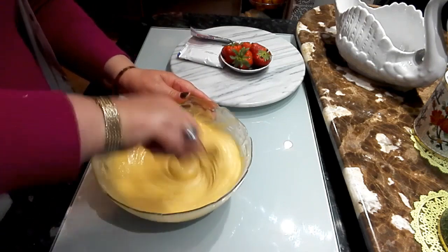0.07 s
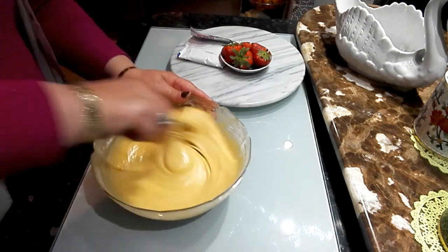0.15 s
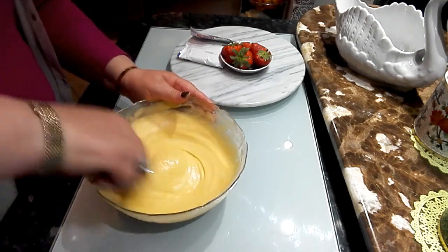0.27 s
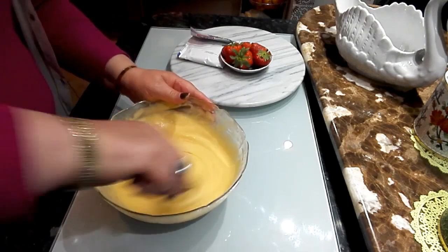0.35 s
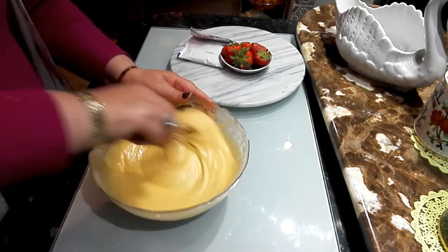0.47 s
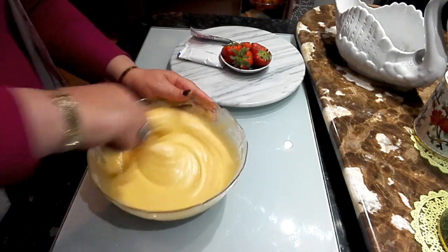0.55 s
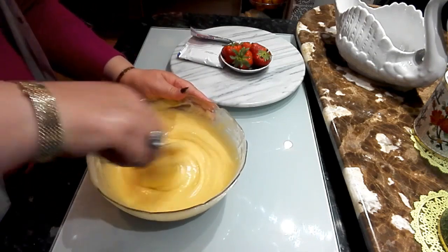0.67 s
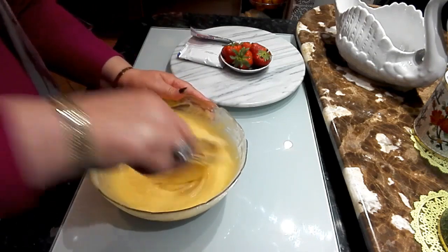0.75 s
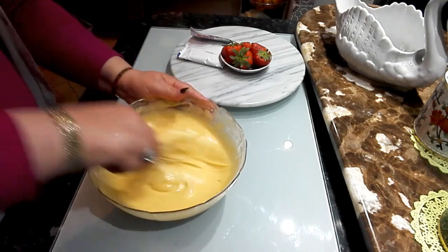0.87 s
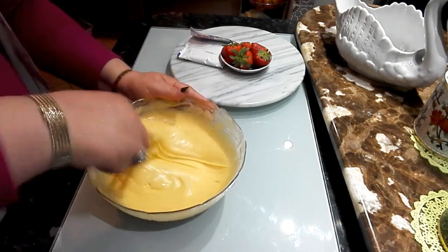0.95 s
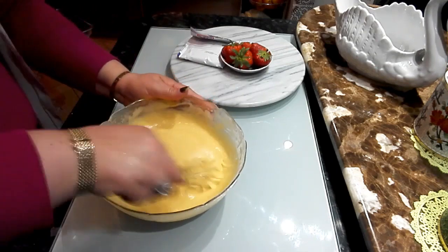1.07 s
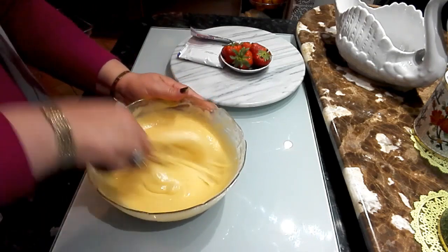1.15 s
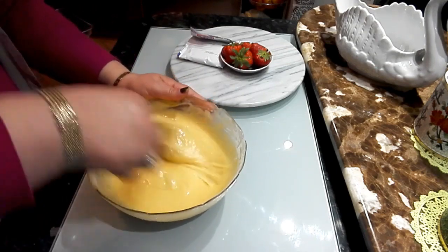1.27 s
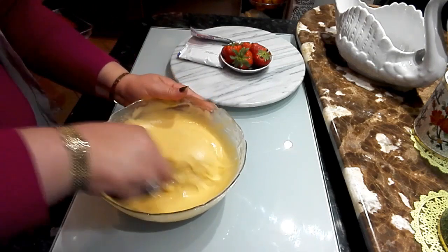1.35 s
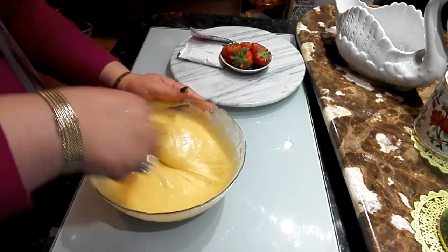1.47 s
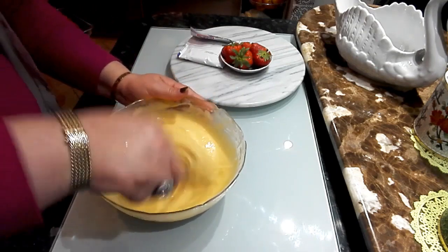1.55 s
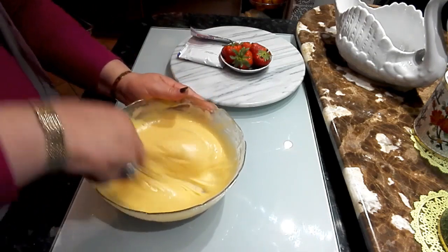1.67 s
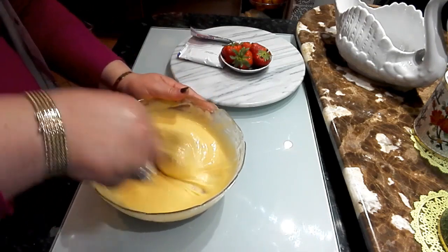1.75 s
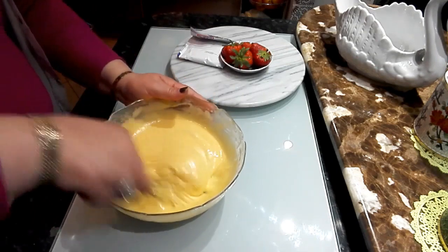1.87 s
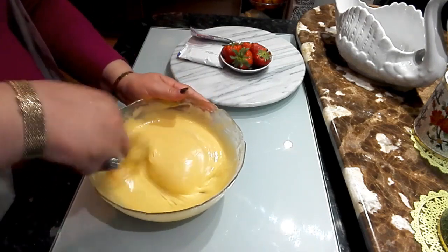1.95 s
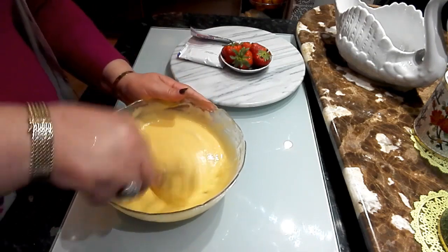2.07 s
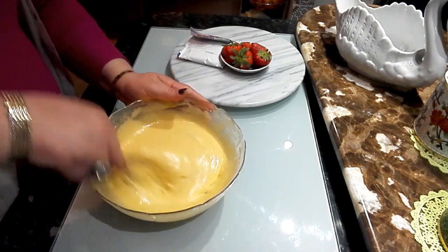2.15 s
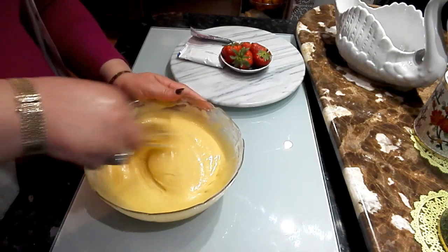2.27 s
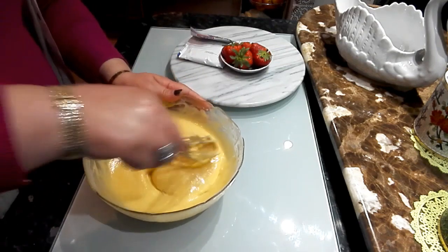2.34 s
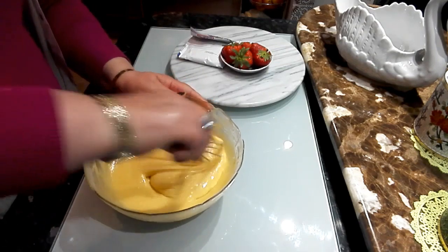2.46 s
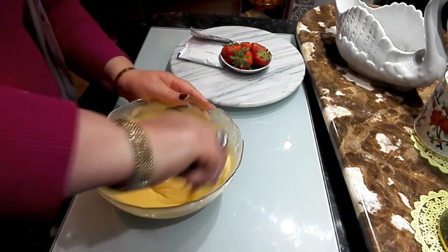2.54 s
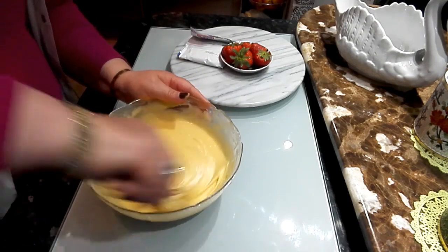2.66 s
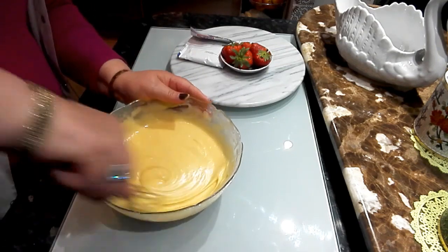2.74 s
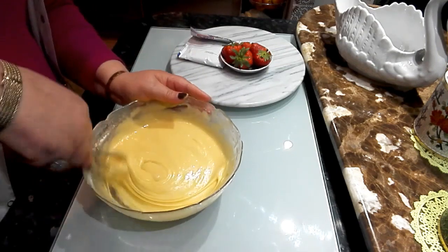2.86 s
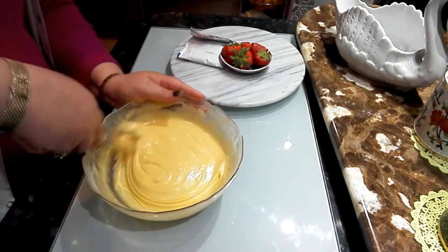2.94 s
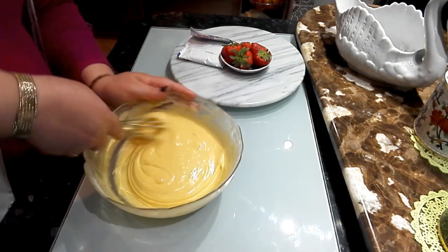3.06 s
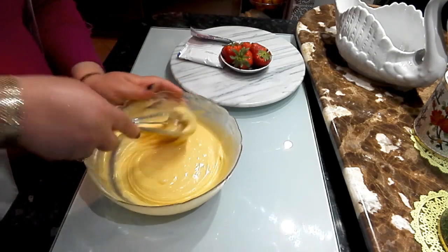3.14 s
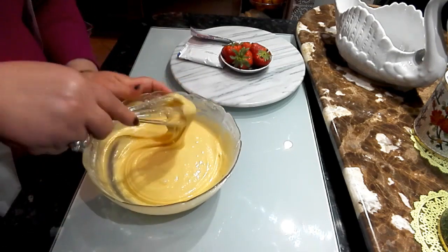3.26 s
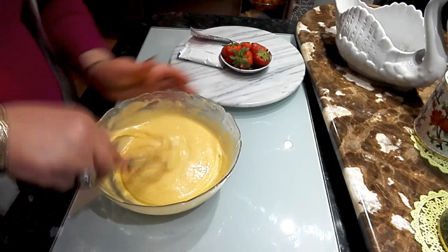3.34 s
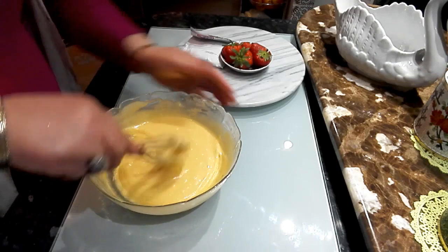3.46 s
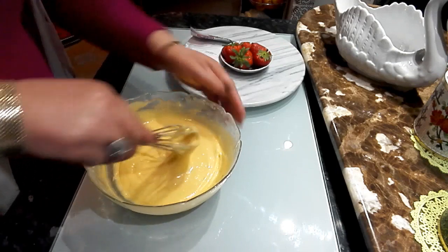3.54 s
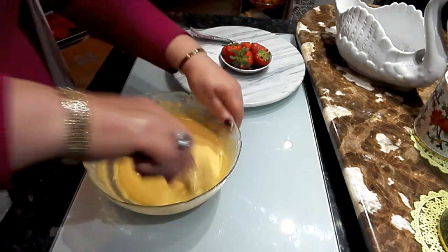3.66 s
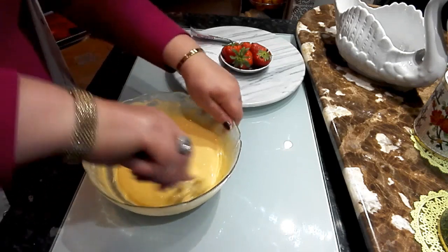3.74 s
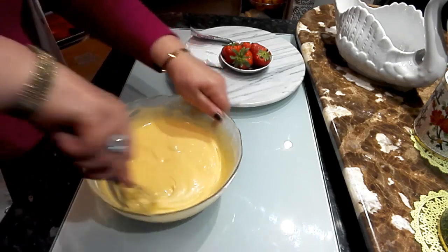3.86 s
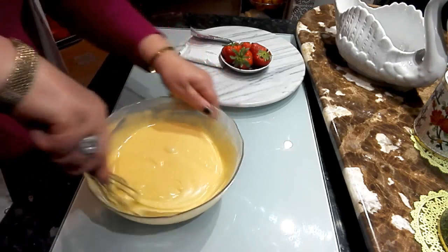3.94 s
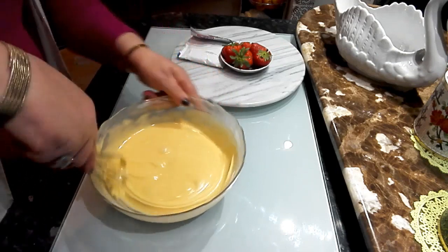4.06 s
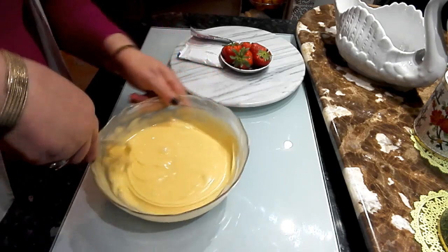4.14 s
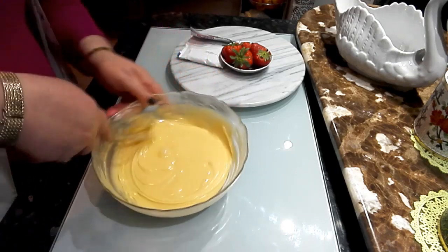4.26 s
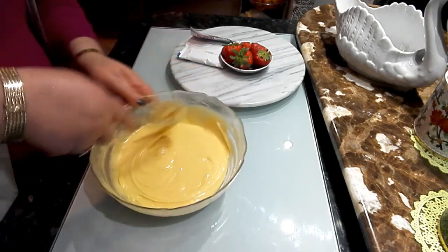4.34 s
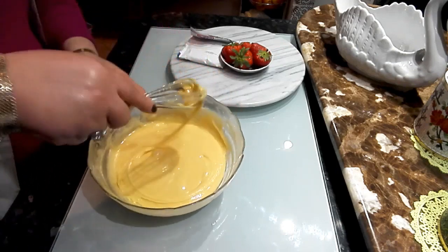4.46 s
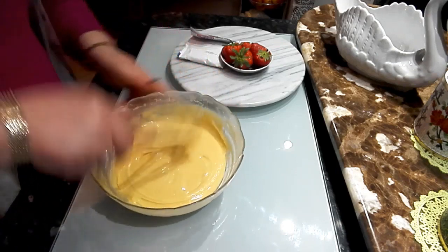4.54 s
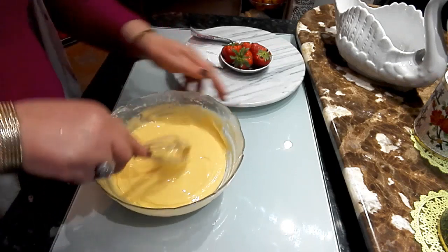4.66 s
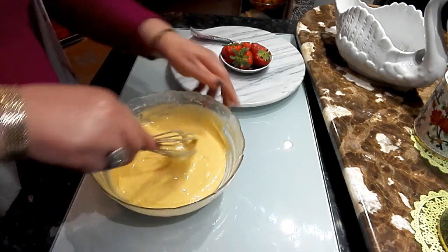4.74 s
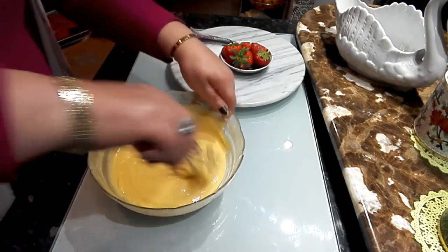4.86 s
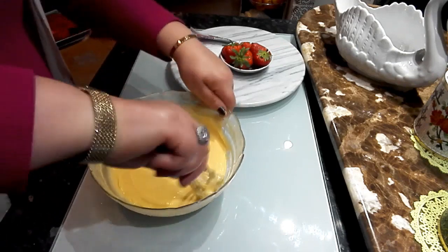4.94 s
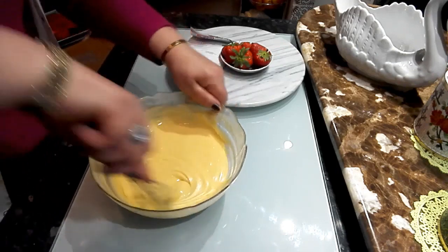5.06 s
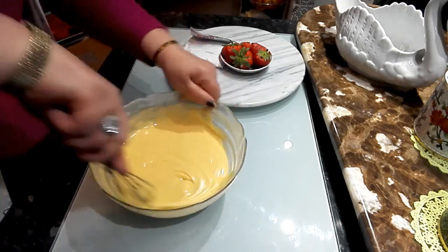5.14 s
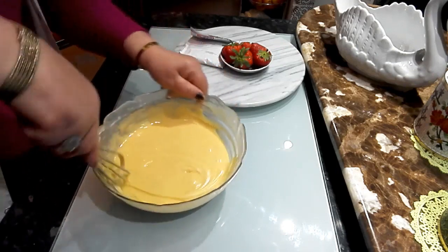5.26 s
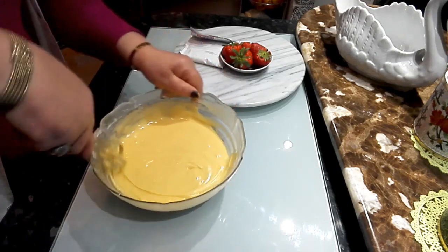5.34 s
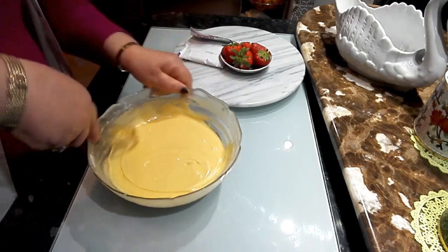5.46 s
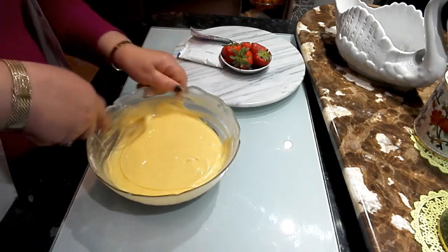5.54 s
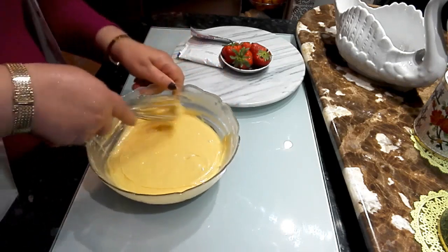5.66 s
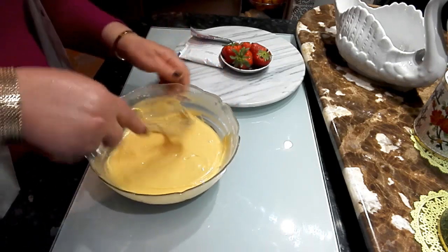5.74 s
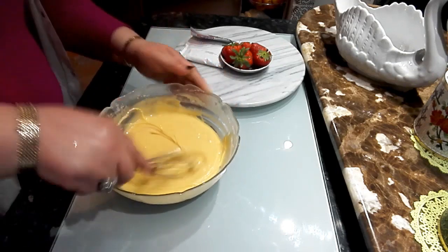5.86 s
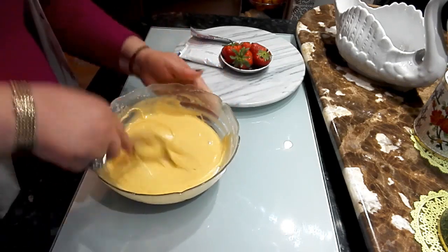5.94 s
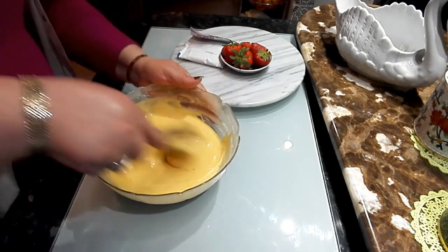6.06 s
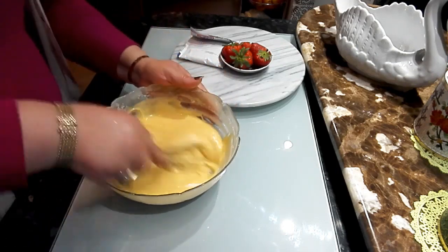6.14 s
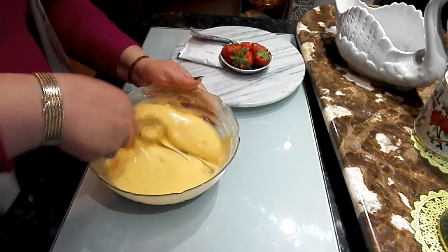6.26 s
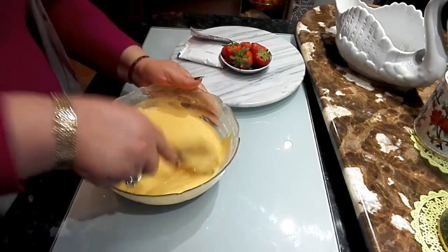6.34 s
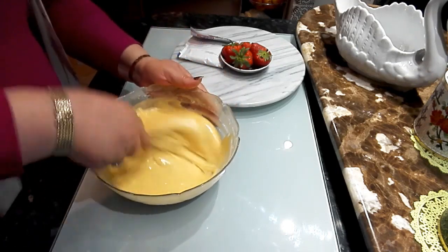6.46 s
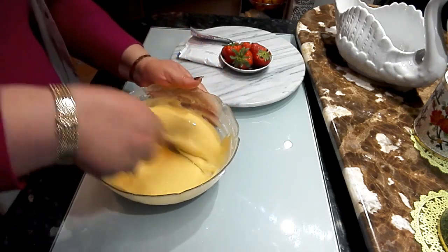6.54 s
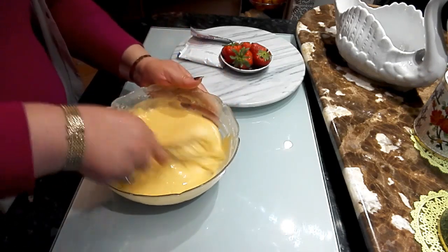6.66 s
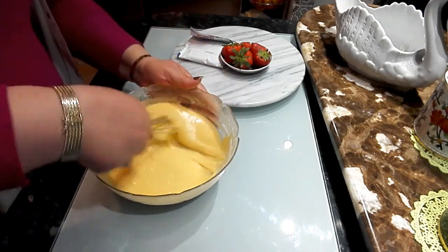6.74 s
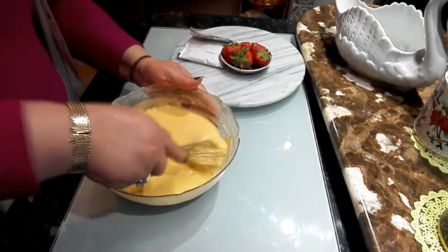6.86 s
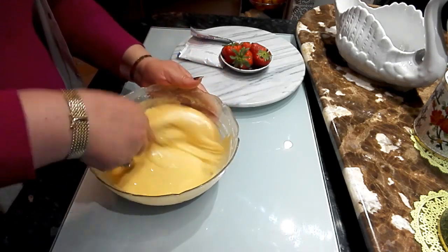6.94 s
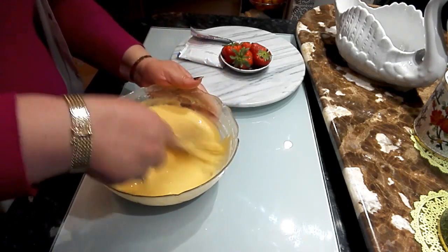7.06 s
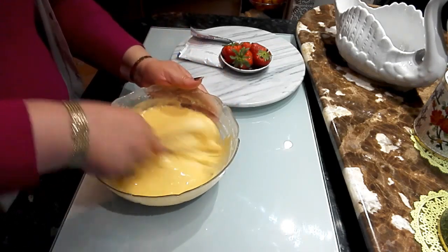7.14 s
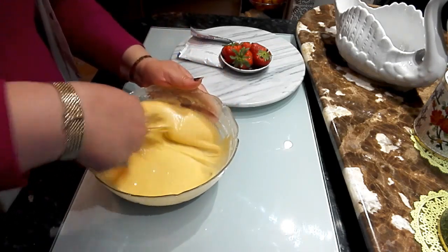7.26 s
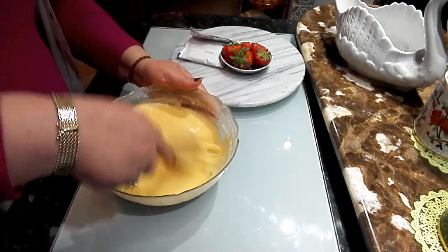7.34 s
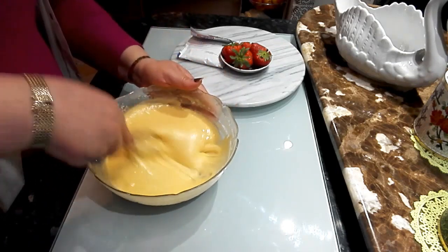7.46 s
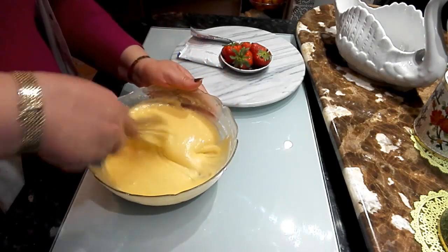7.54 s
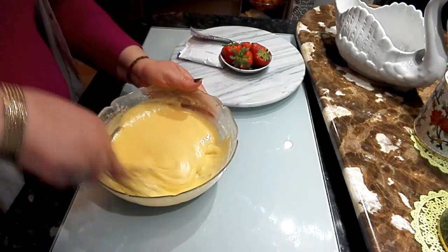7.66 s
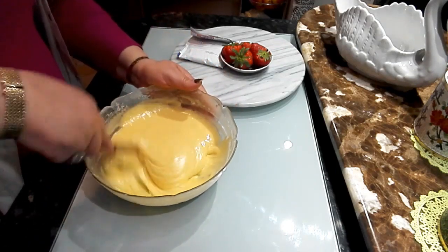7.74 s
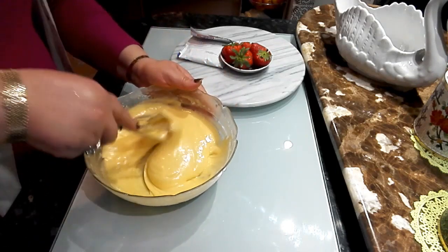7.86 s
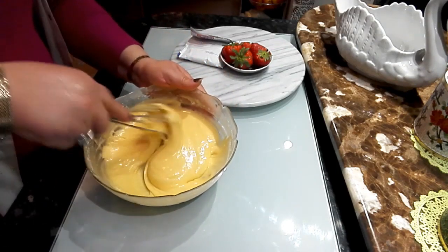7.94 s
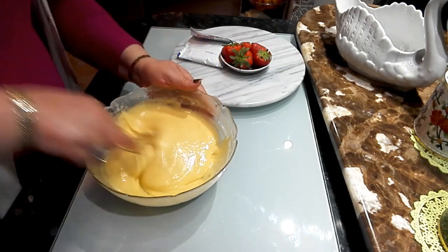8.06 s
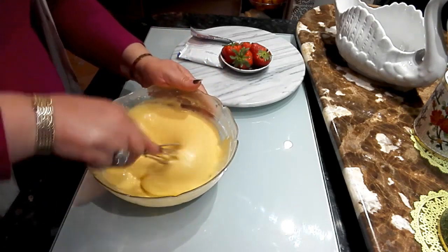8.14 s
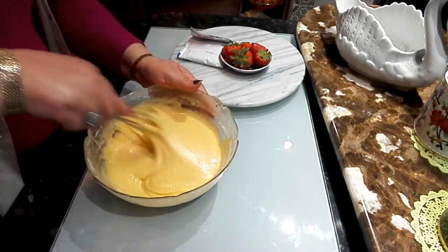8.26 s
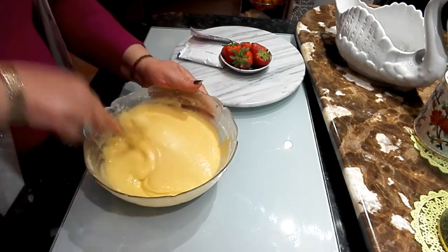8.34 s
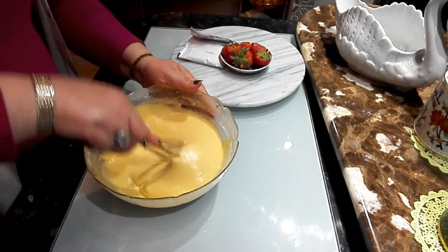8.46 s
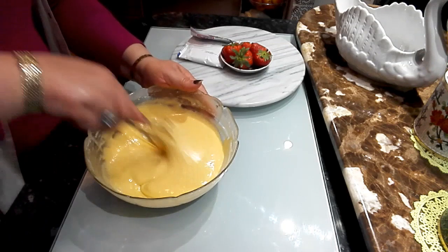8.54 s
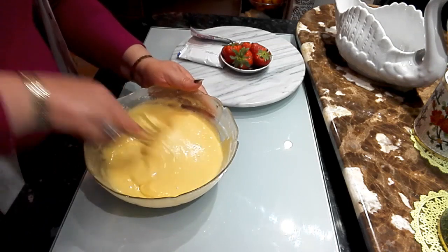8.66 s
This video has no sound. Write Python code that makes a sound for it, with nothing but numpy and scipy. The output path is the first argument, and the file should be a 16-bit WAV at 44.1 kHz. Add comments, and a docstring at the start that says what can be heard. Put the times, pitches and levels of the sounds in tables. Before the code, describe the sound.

Close, irregular clicks and wet scrapes of a metal whisk on a glass bowl of batter, easing into gentler stirring midway.

```python
"""A wire whisk beats thick batter in a glass bowl, close to one mono microphone in a small kitchen.
In each stroke the wires click on the glass, then chatter along it through the batter; some blows plop
or ping. Midway the whisk is lifted, knocked back into the bowl and drawn gently round the wall, where
its wires ring freely. Counter and walls answer briefly; a faint mains hum and room tone lie behind."""
import sys
import numpy as np
from scipy import signal
from scipy.fft import rfft, irfft, next_fast_len
from scipy.io import wavfile
from scipy.ndimage import map_coordinates

SR = 44100
rng = np.random.default_rng(int(sys.argv[2]) if len(sys.argv) > 2 else 0)


def to_wav(s):
    """Save 16-bit WAV."""
    ch = np.atleast_2d(s).T  # columns
    pcm = np.round(np.clip(ch, -1, 1) * 32767)  # PCM
    wavfile.write(sys.argv[1], SR, pcm.astype(np.int16))


N = 383669
TIME = np.arange(N) / SR

# wires dragged through the batter: start t/s, crest t/s, end t/s, scrape level/dB at the crest,
# ends under the crest/dB, slop re scrape/dB, fizz re scrape/dB, squelch f/Hz
WHISK_STROKES = [(.12, .215, .33, -50, 18, -12.5, -14, 2900), (.46, .505, .54, -59.5, 2, -19, -7.5, 5260),
                 (.545, .58, 0.61, -49, 7, -8, -12.5, 2224), (.89, .96, 1.002, -47, 14.5, -9.5, -15, 3700),
                 (1.18, 1.185, 1.282, -41, 14, -12.5, -5, 2400),
                 (1.3, 1.42, 1.447, -50.5, 6, -25.5, -18.5, 3300),
                 (1.445, 1.45, 1.51, -36, 13.5, -14, -6, 3500),
                 (1.692, 1.697, 1.78, -35, 15.5, -20, -7, 2400),
                 (1.86, 1.925, 1.92, -60.5, 6, -9, -35, 3000),
                 (1.94, 1.96, 2.015, -35, 18, -9.5, -11, 3100),
                 (2.22, 2.25, 2.235, -48.5, 7.5, -5.5, -8.5, 2384),
                 (3.24, 3.36, 3.34, -73.5, 6, -14, -25, 4600),
                 (4.87, 4.92, 5.07, -67.5, 7.5, -21.5, -31, 2300),
                 (5.24, 5.3, 5.56, -67, 11, -24.5, -14, 4200),
                 (5.968, 6.005, 6.02, -43, 8, -16.5, -3, 3000),
                 (6.235, 6.31, 6.36, -43.5, 18, -16, -13, 3450),
                 (6.505, 6.51, 6.6, -38.5, 15.5, -11.5, -13.5, 4200),
                 (6.73, 6.79, 6.86, -45.5, 10, -8, -16.5, 3000),
                 (6.97, 6.98, 7, -48.5, 6.5, -13, -14.5, 2900),
                 (7.218, 7.223, 7.34, -47, 8, -5.5, -12.5, 2500),
                 (7.47, 7.544, 7.54, -44, 16.5, -11.5, -5, 3500),
                 (7.74, 7.745, 7.9, -54, 9.5, -15.5, -15.5, 3300),
                 (8.12, 8.215, 8.24, -43.5, 10.5, -11.5, -8.5, 3200),
                 (8.44, 8.535, 8.55, -41.5, 12.5, -12, -11.5, 3400)]
def strokes(slop_sinks_db=9.5, fizz_grows_db=5.5, rise_octaves=.22):
    """Slop, scrape and fizz gains and squelch pitch: each stroke thins as the wires leave the batter."""
    levels, pitch = np.zeros((3, N)), np.full(N, float(WHISK_STROKES[0][-1]))
    for start, crest, end, db, depth, slop, fizz, hz in WHISK_STROKES:
        touch = touching(start, end, edge_s=.005)
        now = touch > 0
        scrape_db = db - depth * np.interp(TIME[now], [start, np.clip(crest, start, end), end], [1, 0, 1])
        progress = np.interp(TIME[now], [start, end], [-.5, .5])
        slop_db = scrape_db + slop - slop_sinks_db * progress
        fizz_db = scrape_db + fizz + fizz_grows_db * progress
        levels[:, now] += touch[now] * amp([slop_db, scrape_db, fizz_db])
        pitch[now] = hz * 2 ** (rise_octaves * progress)
    return levels, pitch


def scrape(pulses, levels, base_per_s, brisk_per_s, spread_db, hiss, bands_db):
    """Wires stick and slip over the glass: a sparse rasp when gentle, a dense chatter when brisk."""
    rate = base_per_s + brisk_per_s * levels[1] / levels[1].max()
    sizes = amp(spread_db * np.clip(rng.standard_normal(N), -2, 2)) * rng.choice([-1, 1], N)
    slips = unit(sizes * (rng.random(N) < rate / SR) / np.sqrt(rate))
    friction = slips + hiss * rng.standard_normal(N)
    return sum(gain * level * unit(convolve(friction, pulse))
               for gain, level, pulse in zip(amp(bands_db), levels, pulses))


# colour of a wire touching the glass: f/Hz, relative level/dB
CONTACT_SPECTRUM = [(150, -22), (280, 2.5), (420, -4), (750, -1), (1000, -1), (1500, 6.5), (2000, 0),
                    (2500, 1), (3400, 6.5), (5500, 6), (6800, -4), (9000, -12.5), (13000, -17.5),
                    (16000, -28)]
def contact_pulses(low_hz=950, high_hz=6750, size=512):
    """The pulse of one contact of wire on glass, in its low, middle and high part."""
    hz = np.fft.rfftfreq(size, 1 / SR)
    low = 1 / (1 + (hz / low_hz) ** 6)
    high = 1 / (1 + (high_hz / (hz + 1)) ** 8)
    gains = np.array([low, (1 - low) * (1 - high), high]) * amp(along(CONTACT_SPECTRUM, hz))
    # minimum phase: nothing sounds before the contact
    cepstrum = irfft(np.log(gains + 1e-4))
    cepstrum[:, 1:size // 2] *= 2
    cepstrum[:, size // 2 + 1:] = 0
    pulses = irfft(np.exp(rfft(cepstrum)))
    return pulses / np.linalg.norm(pulses, axis=1, keepdims=True)


# wires striking the glass: t/s, relative level/dB, brightness/dB, tick f/Hz
WIRE_STRIKES = [(.093, -37.5, -16, 4670), (0.1232, -40, -17, 5550), (0.1294, -27, -17, 5650),
                (0.2128, -30.5, -5, 3230), (0.2427, -27, -18, 1980), (0.3575, -41, -16, 4050),
                (0.4593, -44, -10, 4580), (0.5471, -32, -9, 4100), (0.5865, -28, -37, 1440),
                (.901, -43, -17, 3520), (.937, -34.5, -31, 1200), (0.9536, -32.5, -17, 4670),
                (.978, -29.5, -13, 5050), (0.9932, -28.5, -16, 3000), (1.1764, -16.5, -31, 1900),
                (1.2549, -22.5, -7.5, 2850), (1.44, -9, -19, 3540), (1.5003, -28, -2, 2520),
                (1.6865, -12.5, -17.5, 1510), (1.943, -19, -15.5, 2790), (2.269, -32, -12.5, 2500),
                (2.634, -54.5, -30, 1430), (2.9927, -41, -26, 3410), (3.0228, -38.5, -4.5, 3520),
                (3.479, -14, -12, 5500), (3.803, -30.5, -28, 1540), (4.0512, -41, -18, 6200),
                (4.1361, -39, -16, 4370), (4.179, -42.5, -8.5, 4890), (4.6813, -20.5, -14.5, 1250),
                (5.0364, -14, -20, 4700), (5.2761, -43, -19, 3800), (5.308, -49, -28, 4600),
                (5.331, -45.5, -28, 3700), (5.9627, -17.5, -14, 3560), (5.998, -21, -28, 2290),
                (6.2293, -30.5, -23, 4230), (6.269, -19.5, -19.5, 5050), (6.3129, -21, -12, 3700),
                (6.496, -8.5, -14.5, 5600), (6.553, -29, -19, 3050), (6.5761, -27.5, -13.5, 3130),
                (6.7284, -21, -26, 1990), (6.7717, -31.5, -11, 4897), (6.8048, -36, -11, 3626),
                (6.816, -27, -18, 3400), (6.969, -25, -28, 2670), (7.0327, -32, -24, 3250),
                (7.0473, -31.5, -19, 3460), (7.0603, -29, -19.5, 3500), (7.213, -20, -27.5, 1900),
                (7.302, -26.5, -22, 2500), (7.3671, -38.5, -25, 4900), (7.503, -31, -28, 1380),
                (7.5346, -27, -24, 4500), (7.7374, -30, -25, 2770), (7.8271, -38, -13, 5070),
                (8.114, -29, -19, 4360), (8.126, -29, -7.5, 1460), (8.1542, -26, -19, 5240),
                (8.209, -21, -19, 2320), (8.2296, -23, -9, 2340), (8.4369, -31, -17, 4720),
                (8.4487, -21.5, -15, 4750), (8.4896, -21.5, -17, 3240), (8.544, -21.5, -12.5, 2280)]
def clicks(pulses, extra_taps, squeeze_db=-29, squeeze_s=.017, rattle_db=-12, rattle_t60=.026,
           tick_cycles=19, size=1024):
    """A wire squeezes through the batter, hits the glass with a pitched tick and sets the rest buzzing."""
    track, t = np.zeros(N), np.arange(-size // 2, size) / SR
    buzz = amp(np.where(t < 0, squeeze_db + 60 * t / squeeze_s, rattle_db - 60 * t / rattle_t60))
    after = t[t >= 0]
    for s, db, bright_db, hz in list(WIRE_STRIKES) + extra_taps:
        force = (t == 0) + buzz * rng.standard_normal(len(t))
        low, middle, high = [unit(convolve(force, pulse)) for pulse in pulses]
        tick = np.cos(2 * np.pi * hz * after) * amp(-60 * hz * after / tick_cycles)
        middle = unit(middle + amp(-1.5) * unit(convolve(middle, tick)))
        blow = amp(-13) * low + amp(7) * middle + amp(bright_db + 14.5) * high
        add(track, s + t[0], amp(db) * blow / np.sqrt(len(t)))
    return track


def jolts():
    """The bare push of each listed strike on the wire loops."""
    track = np.zeros(N)
    for s, db, *_ in WIRE_STRIKES:
        add(track, s, amp([db]))
    return track


def stray_taps(levels, pitch, over_db=10.5, bright_db=-6, octaves=.52, count=3):
    """In every stroke a few more wires tap the glass at random, harder where the scrape is louder."""
    rows = []
    for start, _, end, *_ in WHISK_STROKES:
        for k, (when, shift) in enumerate(rng.random((count, 2))):
            s = start + (end - start) * (k + when) / count
            i = min(int(s * SR), N - 1)
            _, scrape_db, fizz_db = 20 * np.log10(levels[:, i] + 1e-9)
            hz = pitch[i] * 2 ** (octaves * (2 * shift - 1))
            rows.append((s, scrape_db + over_db, fizz_db - scrape_db + bright_db, hz))
    return rows


# two slow sweeps round the bowl's wall, one list each: t/s, relative level/dB, rub f/Hz
WALL_SWEEPS = [
    [(2.62, -92, 1440), (2.632, -71, 1400), (2.72, -79.5, 1510), (2.846, -65, 5010), (2.972, -64.5, 2210),
     (3.02, -61, 4350), (3.08, -70, 3040)],
    [(3.83, -61, 2500), (3.91, -63, 1650), (3.956, -63.5, 3080), (4.044, -70.5, 5280), (4.106, -64, 3800),
     (4.178, -63.5, 4380), (4.28, -76.5, 3730)],
]
def wall_rub(pulses, judder_db=4):
    """Drawn slowly round the wall, the wires give a fine, juddering rub with little slop or fizz."""
    db, pitch = curves(np.vstack(WALL_SWEEPS))
    touch = sum(touching(rows[0][0], rows[-1][0], edge_s=.012) for rows in WALL_SWEEPS)
    level = amp(db + judder_db * wobble(70)) * touch
    rub = scrape(pulses, [level] * 3, base_per_s=1200, brisk_per_s=3000, spread_db=4, hiss=.65,
                 bands_db=(-20, -10, -14))
    return squelch(rub, pitch, lift_db=5.5, octaves=1)


# how far the wires are clear of the batter: t/s, share (0-1)
WIRE_CLEARANCE = [(2.5, 0.1), (2.7, 0.06), (3.35, 0.1), (3.5, 0), (3.78, 0.39), (4.3, 0), (4.75, 0.06),
                  (4.9, 0.36), (5.5, 0.34), (5.9, 0.11)]
def clearance():
    """Batter chokes the wires: they ring only as far as they are clear of it."""
    return np.clip(curves(WIRE_CLEARANCE)[0], 0, 1)


# modes of the free whisk: f/Hz, relative level/dB, t60/s
WHISK_MODES = [(926, -9, .2), (1480, -9.5, 0.15), (1635, -4.5, .26), (2450, -1.5, 0.21), (3400, 1, .26),
               (3810, -3.5, 0.12), (4380, -12.5, 0.32), (4570, -1, 0.33), (4947, -16, 0.19),
               (5700, -5, .23), (5750, -1.5, 0.071), (7100, -11.5, 0.16), (8420, -18.5, .14),
               (9600, -19.5, .14)]
def wire_ring(push, rub, loops=3):
    """Each wire loop is tuned a little differently, so every mode is a beating cluster."""
    struck = sum(body(push, WHISK_MODES, detune=.014, scatter_db=1) for _ in range(loops))
    # sliding wires are pressed on the glass at ever new points, so their pitch keeps shifting
    sliding = body(rub, WHISK_MODES, detune=.04, scatter_db=0, count=110)
    return struck / np.sqrt(loops) + sliding


# modes of the filled glass bowl: f/Hz, relative level/dB, t60/s
BOWL_MODES = [(289, -7.5, 0.18), (442.8, -3.5, 0.14), (765, -28, 0.059), (1430, 2.5, 0.053),
              (1830, -3, 0.045), (2436, -18, 0.033), (3000, -6.5, .04), (3400, 2.5, 0.013),
              (3760, -14.5, .03), (4910, -4, 0.072), (5370, 3.5, 0.011), (7300, -6.5, .025)]
def bowl_ring(blows, wet, rub):
    """Blows, wet scraping and rubbing ring the glass briefly."""
    push = amp(-23) * blows + amp(-12) * wet + amp(-15) * rub
    return body(push, BOWL_MODES, detune=.038, scatter_db=7)


def squelch(x, pitch, lift_db, octaves):
    """The furrow behind the whisk opens and closes: one moving resonance."""
    hz, t, spectrum = signal.stft(x, SR, nperseg=256)
    octaves_off = np.log2((hz[:, None] + 1) / np.interp(t, TIME, pitch))
    resonance = amp(lift_db * np.exp(-(octaves_off / octaves) ** 2))
    return signal.istft(spectrum * resonance, SR, nperseg=256)[1][:N]


def smacks(pitch, per_s=300, octaves=.9, cycles=45, rise=.06, size=512):
    """Films of batter tear off the wires: tiny bubbles near the squelch pitch, each rising as it dies."""
    when, shift, strength = rng.random((int(per_s * N / SR), 3)).T
    start = (when * N).astype(int)
    hz = pitch[start] * 2 ** (octaves * (2 * shift - 1))
    turns = hz[:, None] * np.arange(size) / SR
    envelope = strength[:, None] ** 2 * amp(-60 * turns / cycles)
    bubbles = envelope * np.sin(2 * np.pi * turns * (1 + rise * turns / cycles))
    samples = start[:, None] + np.arange(size)
    return unit(np.bincount(samples.ravel(), bubbles.ravel(), N)[:N])


# short pitched notes at the blows: t/s, f/Hz, level/dB
BLOW_NOTES = [(.243, 844, -42.5), (.46, 4700, -23.5), (.585, 800, -49), (.13, 1280, -42), (1.439, 298, -40),
              (1.177, 1867, -26), (1.177, 760, -34.5), (1.687, 510, -32), (1.687, 720, -22),
              (1.688, 885, -23.5), (1.687, 1170, -21.5), (1.687, 1830, -19), (2.635, 1430, -44),
              (3.479, 4900, -13), (3.48, 285.4, -31), (3.48, 755, -28), (3.805, 1570, -38),
              (4.681, 344, -41), (4.681, 826, -39), (4.681, 1310, -29), (5.963, 770, -34.5),
              (6.969, 1630, -30.5), (7.214, 291.7, -37.5), (7.214, 1430, -44), (8.19, 249, -52)]
def plops_and_pings(cycles=22.7, attack_s=.0011):
    """Hollow plops of batter, and pings and knocks of wire on glass; the higher notes die sooner."""
    track, t = np.zeros(N), np.arange(SR // 5) / SR
    for s, hz, db in BLOW_NOTES:
        envelope = amp(db - 60 * hz * t / cycles) * (1 - np.exp(-t / attack_s))
        add(track, s, envelope * np.sin(2 * np.pi * hz * t))
    return track


# decay of the small kitchen: f/Hz, t60/s
KITCHEN_DECAY = [(200, 0.21), (1000, 0.28), (4500, 0.25), (8000, 0.23), (15000, 0.24)]
def kitchen(x, gap_s=.004, count=32):
    """Counter and walls answer, reaching the microphone just after the direct sound."""
    hz, t, noise = signal.stft(rng.standard_normal((count, SR // 2)), SR, nperseg=256)
    decay = amp(-60 * t / along(KITCHEN_DECAY, hz)[:, None])
    tails = signal.istft(noise * decay, SR, nperseg=256)[1]
    tails = np.pad(tails, ((0, 0), (round(gap_s * SR), 0)))
    return changing(x, tails / np.linalg.norm(tails, axis=1, keepdims=True))


# tones of motor and mains: f/Hz, relative level/dB
HUM_TONES = [(49.22, -81), (98.44, -74), (100.03, -75), (179.5, -83), (200.04, -79)]
# slow swell of hum and drone: t/s, relative level/dB
HUM_LEVEL = [(0, -0.5), (1.3, 0.5), (3.4, -3), (4.4, -4), (5.6, -5.5), (7, 1), (8.05, 1), (8.7, -14)]
def mains_hum(beat_crest_s=.42, drift_rad=.25, drone_hz=218, width_hz=19, waver_db=3.5):
    """A motor's second order beats slowly against twice the mains rate; a low drone wavers with them."""
    t = TIME - beat_crest_s
    wander = drift_rad * wobble(3)
    hum = sum(amp(db) * unit(np.cos(2 * np.pi * hz * t + wander)) for hz, db in HUM_TONES)
    band = filtered(rng.standard_normal(N), lambda hz: 1 / (1 + ((hz - drone_hz) / width_hz) ** 2))
    drone = unit(band * amp(waver_db * wobble(4.6)))
    return amp(curves(HUM_LEVEL)[0]) * (amp(-1) * hum + amp(-72) * drone)


# the quiet kitchen at the microphone: f/Hz, relative level/dB
ROOM_SPECTRUM = [(12, -40), (20, -16), (53, -1), (70, -13), (101, -9.5), (154, -9.5), (193, -4.5),
                 (357, -16), (472, -16.5), (678, -25.5), (1000, -20.5), (1480, -24.5), (4670, -27.5),
                 (13500, -36.5), (16000, -49)]
def room_tone(rms_db=-71):
    """A steady low rumble under a faint hiss."""
    return amp(rms_db) * unit(filtered(rng.standard_normal(N), lambda hz: amp(along(ROOM_SPECTRUM, hz))))


def body(x, modes, detune, scatter_db, count=29):
    """x rings a set of damped modes; grip and batter shift their pitch and strength as time goes on."""
    t = np.arange(SR // 4) / SR
    rings = np.zeros((count, len(t)))
    for ring in rings:
        for hz, db, t60 in modes:
            shift, strength = rng.uniform(-1, 1, 2)
            envelope = amp(db + scatter_db * strength - 60 * t / t60)
            ring += envelope * np.sin(2 * np.pi * hz * (1 + detune * shift) * t)
    return changing(x, rings / np.linalg.norm(rings, axis=1, keepdims=True))


def changing(x, answers):
    """x through a row of impulse responses that take turns as the whisk moves."""
    track = np.zeros(N)
    for span, answer in zip(np.array_split(np.arange(N), len(answers)), answers):
        add(track, span[0] / SR, signal.fftconvolve(x[span], answer))
    return track


def touching(start, end, edge_s):
    """1 while the wires are on the glass, with short ramps either side."""
    return np.interp(TIME, [start - edge_s, start, end, end + edge_s], [0, 1, 1, 0])


def amp(db):
    """Decibels to gain."""
    return 10 ** (np.asarray(db) / 20)


def unit(x):
    """x at rms 1."""
    return x / np.sqrt(np.mean(x ** 2) + 1e-20)


def along(points, hz):
    """(f/Hz, value) points joined on a log frequency axis."""
    knots_hz, values = np.transpose(points)
    return np.interp(np.log(hz + 1), np.log(knots_hz + 1), values)


def curves(rows):
    """One value per sample for each column after the time."""
    s, *columns = np.transpose(rows)
    return [np.interp(TIME, s, column) for column in columns]


def wobble(per_s):
    """A smooth random curve with per_s knots a second."""
    return map_coordinates(rng.standard_normal(int(N * per_s / SR) + 4), [TIME * per_s])


def filtered(x, response):
    """x shaped by a gain that depends on frequency."""
    size = next_fast_len(N + SR // 2)
    return irfft(rfft(x, size) * response(np.fft.rfftfreq(size, 1 / SR)), size)[:N]


def convolve(x, answer):
    """x through an impulse response."""
    return signal.oaconvolve(x, answer)[:len(x)]


def add(track, s, sound):
    """Mix a sound in from time s."""
    part = track[max(round(s * SR), 0):][:len(sound)]
    part += sound[:len(part)]


def scene():
    """Whisk, bowl and batter close to the microphone, the kitchen and its hum behind them."""
    pulses = contact_pulses()
    levels, pitch = strokes()
    blows = clicks(pulses, stray_taps(levels, pitch))
    drag = scrape(pulses, levels, base_per_s=300, brisk_per_s=2500, spread_db=4.5, hiss=.37,
                  bands_db=(-7, -10.5, -.5))
    drag = squelch(drag, pitch, lift_db=4.5, octaves=.77)
    drag += amp(-9.5) * levels[1] * smacks(pitch)
    rub = wall_rub(pulses)
    clear = clearance()
    wires = wire_ring(clear * (amp(8) * jolts() + amp(-3) * drag), amp(.5) * clear * rub)
    wet = (drag + rub) * (1 - .75 * clear)
    bowl = bowl_ring((1 - clear) * blows, wet, rub)
    near = blows * (1 - .13 * clear) + wet + bowl + wires + plops_and_pings()
    return (near + amp(-6) * kitchen(near) + mains_hum() + room_tone())[None]


def record(dry, top_hz=16450, edge_hz=700):
    """One microphone into a recorder that keeps nothing above its band limit."""
    return filtered(dry[0], lambda hz: np.clip((top_hz - hz) / edge_hz, 0, 1))[None]


dry = scene()
out = record(dry)
to_wav(out)
```